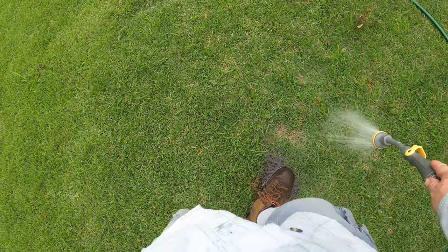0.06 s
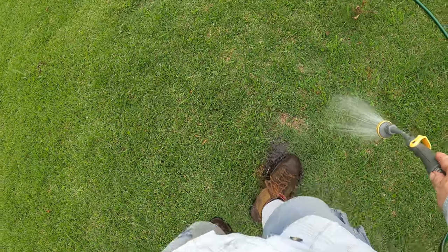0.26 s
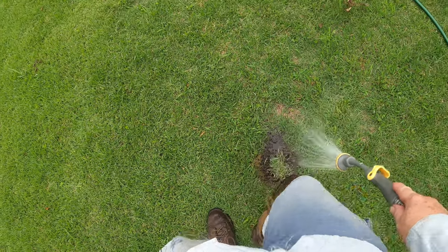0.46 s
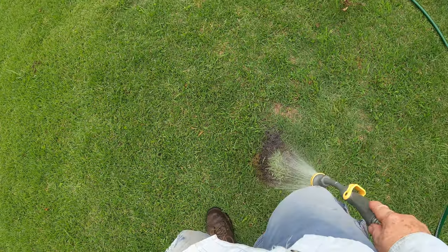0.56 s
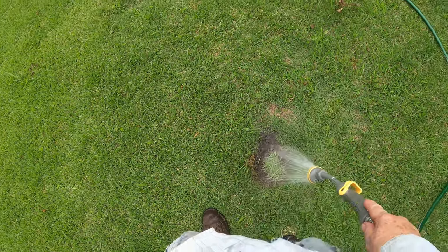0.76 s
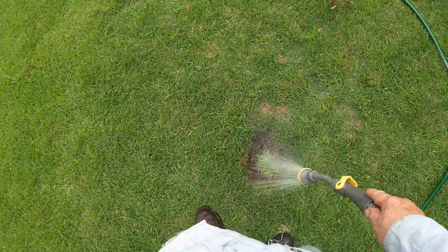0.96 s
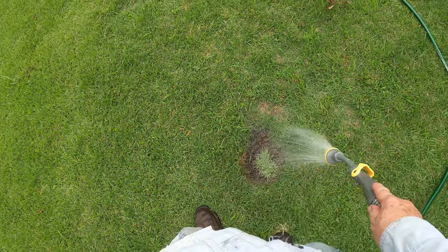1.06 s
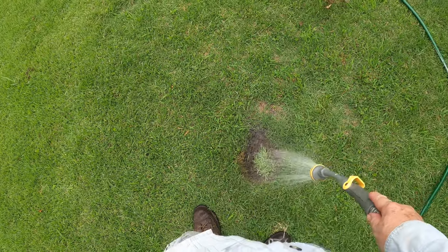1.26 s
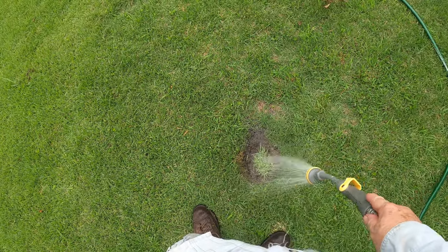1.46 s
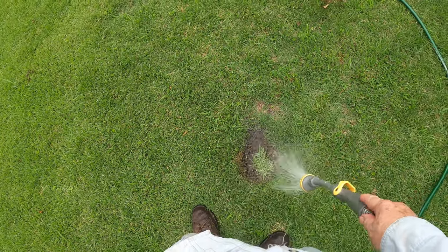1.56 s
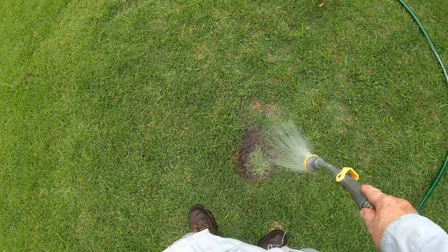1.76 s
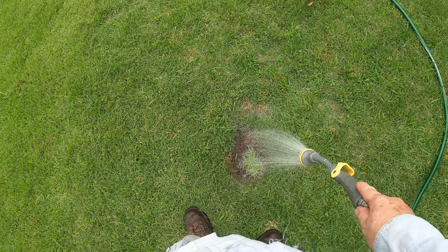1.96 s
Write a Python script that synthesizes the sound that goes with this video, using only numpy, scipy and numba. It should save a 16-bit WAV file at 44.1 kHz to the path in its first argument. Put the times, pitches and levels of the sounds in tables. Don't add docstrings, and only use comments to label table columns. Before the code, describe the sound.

Hose spray hisses softly on grass, a boot squelches once, then the water patters louder and brighter in uneven passes over wet soil, with faint gurgles and plops; outdoors, low wind, close chest-height stereo microphone.

```python
import sys
import numpy as np
from scipy import signal
from scipy.fft import rfft, irfft
from scipy.io import wavfile
from scipy.ndimage import uniform_filter1d
from numba import njit

SR = 44100
rng = np.random.default_rng(int(sys.argv[2]) if len(sys.argv) > 2 else 0)


def to_linear_factor(level_db):
    exponent = np.asarray(level_db, float) / 20
    return 10 ** exponent


def transcribe(signal):
    frames = np.atleast_2d(signal).T
    limited = np.clip(frames, -1, 1)
    pcm = np.round(limited * 32767).astype(np.int16)
    wavfile.write(sys.argv[1], SR, pcm)


N = 88200
T = np.arange(N) / SR
HZ = np.maximum(np.fft.rfftfreq(N, 1 / SR), 1)

# start in seconds, end in seconds,
# level in dB at the start, level in dB at the end.
SWEEPS = [
    (0.648, 0.982, -38, -33),
    (1.009, 1.189, -35.5, -31.5),
    (1.278, 1.428, -37, -32),
    (1.456, 1.535, -35, -33),
    (1.556, 1.654, -33, -33.5),
    (1.684, 1.877, -35, -34),
    (1.913, 2.04, -32, -37),
]


def sweeps():
    attack_s, release_s = 0.014, 0.015
    start, end, db_start, db_end = np.array(SWEEPS, float).T[:, :, None]
    swell = 1 / (1 + np.exp((start - T) / attack_s))
    fall = 1 / (1 + np.exp((T - end) / release_s))
    progress = np.clip((T - start) / (end - start), 0, 1)
    return (swell * fall * to_linear_factor(db_start + (db_end - db_start) * progress)).sum(axis=0)


# frequency in Hz, density in dB per Hz.
SOIL_COLOUR = [(500, -20), (1100, -7.5), (2000, -1.5), (4300, -1.5), (9000, -7), (13700, -14.5),
               (14300, -36), (15600, -22)]


def spray_on_soil():
    patter = spray(SOIL_COLOUR, per_s=16000, cycles=2.2, scatter_db=2.0,
                   hiss_db=-2.5, flicker_db=1.3, sway_db=0.97)
    return sweeps() * patter


# frequency in Hz, density in dB per Hz.
GRASS_COLOUR = [(700, -17.5), (1200, -3.5), (2300, -1.5), (4300, -5.5), (9000, -9.5), (13700, -20.5),
                (14300, -32), (15600, -28)]


def spray_on_grass():
    faded = 1 / (1 + np.exp(-(T - 0.52) / 0.36))
    level = to_linear_factor(-38.5 - 3.5 * faded)
    return level * spray(GRASS_COLOUR, per_s=20000, cycles=1.68, scatter_db=2.0,
                         hiss_db=-1.5, flicker_db=0.77, sway_db=-0.56)


def spray(colour, per_s, cycles, scatter_db, hiss_db, flicker_db, sway_db):
    sway = sway_db * walk(10.37)
    showers = []
    for _ in range(2):
        hiss = to_linear_factor(hiss_db) * rng.standard_normal(N)
        showers.append(drops(per_s, cycles, scatter_db) + hiss)
    showers = np.array(showers)
    out = np.zeros((2, N))
    for octave in range(8, 15):
        band = np.maximum(1 - np.abs(np.log2(HZ) - octave), 0) * to_linear_factor(over_hz(colour))
        out += to_linear_factor(sway + flicker_db * walk(17.98)) * shape(showers, band)
    return unit(out)


def drops(per_s, cycles, scatter_db):
    count = int(per_s * N / SR)
    start = rng.random(count) * N
    hz = 300 * 55 ** rng.random(count)
    scatter = to_linear_factor(-scatter_db * np.log(1 - .999 * rng.random(count)))
    size = hz * scatter * rng.choice([-1, 1], count)
    return unit(rings(N, start, hz, cycles + 0 * hz, size, 0.058, 1. * SR))


@njit
def rings(n, start, hz, cycles, size, glide, sr):
    out = np.zeros(n)
    for j in range(len(start)):
        w = 2 * np.pi * hz[j] / sr
        decay = hz[j] / (cycles[j] * sr)
        turn = np.exp(1j * w - decay)
        rise = np.exp(1j * w * glide * decay)
        z = size[j] + 0j
        for i in range(int(start[j]), min(n, int(start[j] + 5 * cycles[j] * sr / hz[j]))):
            z = z * turn
            turn = turn * rise
            out[i] += z.imag
    return out


# frequency in Hz, density in dB per Hz.
MIST_COLOUR = [(3000, -14), (7000, -9), (10000, -2), (13500, 0), (14500, -21), (15600, -12)]


def mist():
    turned = 1 / (1 + np.exp((0.53 - T) / .01))
    level = to_linear_factor(-57 + 4 * turned + 0.4 * walk(8.8))
    return level * unit(shape(rng.standard_normal((2, N)), to_linear_factor(over_hz(MIST_COLOUR))))


# start in seconds, pitch in Hz, length in cycles, level in dB.
PLOPS = [
    (0.334, 1900, 0.96, -20),
    (1.4947, 2860, 4.5, -23),
    (1.868, 70, 1.1, -33.5),
    (1.95, 359, 4, -32),
    (1.991, 128, 4.3, -33),
]


def plops():
    start, hz, cycles, db = np.array(PLOPS, float).T[:, :, None]
    age = np.maximum(T - start, 0) * hz / cycles * 4
    swell = np.e * age * np.exp(-age)
    tone = np.sin(np.pi / 2 * cycles * age * (1 + 0.017 * age))
    return (to_linear_factor(db) * swell * tone).sum(axis=0)


# start in seconds, length in seconds, pitch in Hz at the start,
# pitch in Hz at the end, level in dB.
SQUELCH = [
    (.3365, .006, 1700, 1500, -38),
    (.3495, .027, 1850, 1500, -33),
    (.36, .022, 1400, 1100, -39),
    (.35, .03, 2700, 2200, -41),
]


def squelch():
    return bursts(SQUELCH, 4000, cycles=2.4, spread=.2)


# start in seconds, length in seconds, pitch in Hz at the start,
# pitch in Hz at the end, level in dB.
GURGLE = [
    (1.0, .15, 460, 590, -55),
    (1.16, .15, 510, 590, -50),
    (1.5, .5, 425, 430, -61.5),
]


def gurgle():
    return bursts(GURGLE, 350, cycles=3.4, spread=0.21)


def bursts(table, per_s, cycles, spread):
    out = np.zeros(N)
    for start, length, hz_start, hz_end, db in table:
        when, detune, loudness = rng.random((int(per_s * length) + 2, 3)).T
        hz = (hz_start + (hz_end - hz_start) * when) * np.exp(spread * (2 * detune - 1))
        size = (0.68 + loudness) * (1 - when) ** 0.19
        size = size * (-1.) ** np.arange(len(hz))
        burst = rings(N, (start + length * when) * SR, hz, cycles + 0 * hz, size, 0., 1. * SR)
        out += unit(burst) * to_linear_factor(db) * np.sqrt(length * SR / N)
    return out


def small_wet_events():
    small = squelch() + gurgle() + plops()
    pair = np.array([small, 0.23 * np.roll(small, 40)])
    return ports(pair) * to_linear_factor(np.array([[0.5], [-0.5]]) / 2)


# frequency in Hz, density in dB per Hz.
AIR_COLOUR = [(20, -17), (35, -2), (60, 0.5), (110, -3), (200, -13), (350, -21.5), (700, -21), (1400, -55)]
# time in seconds, level in dB.
GUSTS = [(0, -43.5), (.1, -46), (.18, -47), (.22, -48.5), (.53, -46.5), (.56, -44), (.63, -46), (.73, -52),
         (.93, -44), (.97, -48), (1.15, -45.5), (1.33, -44), (1.41, -50.5), (1.75, -45), (1.9, -49),
         (2, -38)]


def air():
    hum_hz, hum_width_hz, alike, left_db = 55, 7, .8, 3.6
    rumble_gain = to_linear_factor(over_hz(AIR_COLOUR)) * (HZ < 3000)
    hum_gain = 1 / (1 + ((HZ - hum_hz) / hum_width_hz) ** 2)
    gust = to_linear_factor(uniform_filter1d(np.interp(T, *np.array(GUSTS, float).T), 1500))
    parts = []
    for _ in range(2):
        rumble = unit(shape(rng.standard_normal(N), rumble_gain))
        hum = unit(shape(rng.standard_normal(N), hum_gain))
        parts.append(gust * (rumble + to_linear_factor(-7) * hum))
    mid, side = parts
    pair = np.sqrt((1 + alike) / 2) * mid + np.sqrt((1 - alike) / 2) * side * np.array([[1], [-1]])
    return pair * to_linear_factor(np.array([[left_db], [-left_db]]) / 2)


# frequency in Hz, gain in dB.
LEFT_PORT = [(500, -0.5), (1300, -2), (2400, 4.5), (7500, 3.5), (8100, -6), (9200, 5), (11500, -11.5),
             (15000, 2)]
RIGHT_PORT = [(1300, -0.3), (2400, 2.5), (5000, 3), (6300, -3), (7000, -1), (8100, 0), (8800, 5.5)]
# frequency in Hz, lead over the right in radians.
LEFT_LEAD = [(100, -.1), (860, -.7), (1700, -.45), (4300, -1.15), (5600, -1.), (6600, -2.5), (7900, -3.2),
             (8700, -2.1)]
# frequency in Hz, likeness from 0 to 1.
ALIKE = [(500, .78), (1600, .93), (5000, .91), (6300, .76), (7200, .9), (8200, .72), (9200, .88),
         (14500, .62)]


def ports(pair, lag_s=0.):
    alike = np.clip(over_hz(ALIKE), 0, 1)
    treble_lead = -0.6 * np.clip((HZ - 8700) / 1200, 0, 1)
    lead = over_hz(LEFT_LEAD) + treble_lead - 2 * np.pi * HZ * lag_s
    same, other = np.sqrt((1 + alike) / 2), np.sqrt((1 - alike) / 2)
    left = to_linear_factor(over_hz(LEFT_PORT)) * np.exp(1j * lead)
    right = to_linear_factor(over_hz(RIGHT_PORT))
    return np.array([shape(pair[0], same * left) + shape(pair[1], other * left),
                     shape(pair[0], same * right) - shape(pair[1], other * right)])


def over_hz(table):
    hz, value = np.array(table, float).T
    return np.interp(np.log(HZ), np.log(hz), value)


def shape(x, gain):
    return irfft(rfft(x) * gain, N)


def unit(x):
    return x / np.sqrt(np.mean(x ** 2))


def walk(rate):
    hold = int(SR / rate)
    steps = np.repeat(rng.standard_normal(N // hold + 1), hold)
    return 0.93 * uniform_filter1d(uniform_filter1d(steps, hold), hold)[:N]


def scene():
    patch = ports(spray_on_soil() + mist())
    grass = ports(spray_on_grass(), lag_s=1.2e-5)
    return patch + grass + small_wet_events() + air()


def roll_off(x):
    return signal.sosfilt(signal.butter(12, 15610, fs=SR, output="sos"), x)


def record(dry):
    return roll_off(dry)


dry = scene()
out = record(dry)
transcribe(out)
```